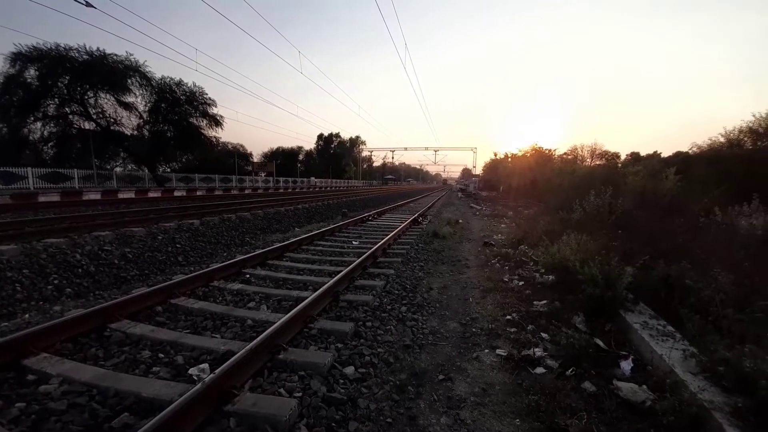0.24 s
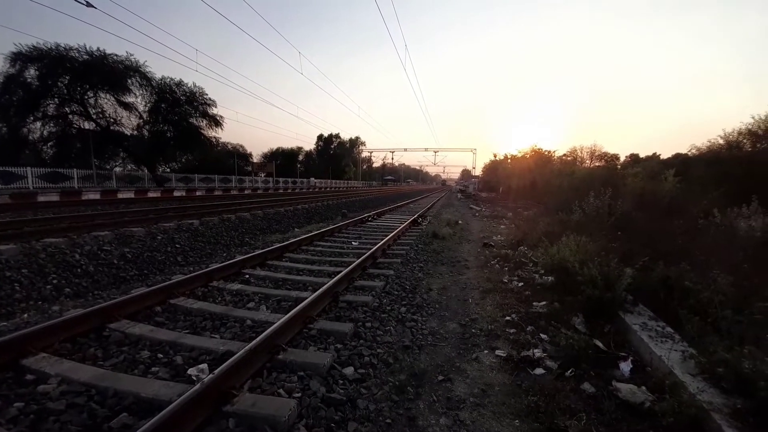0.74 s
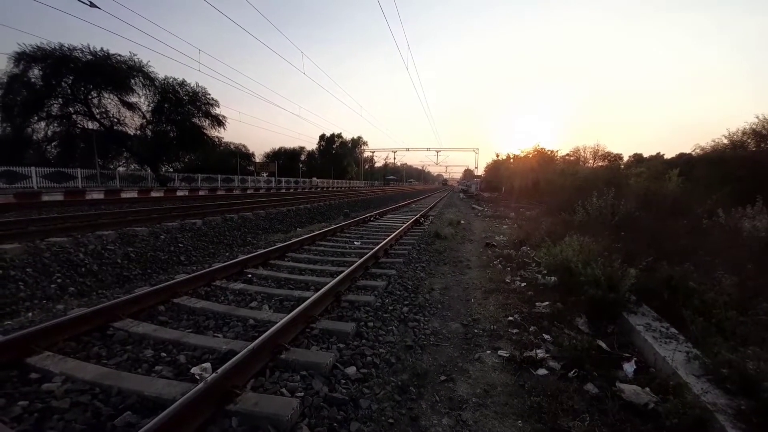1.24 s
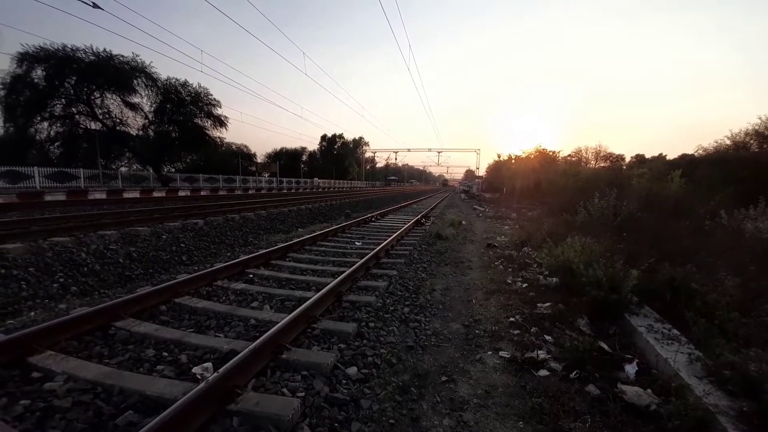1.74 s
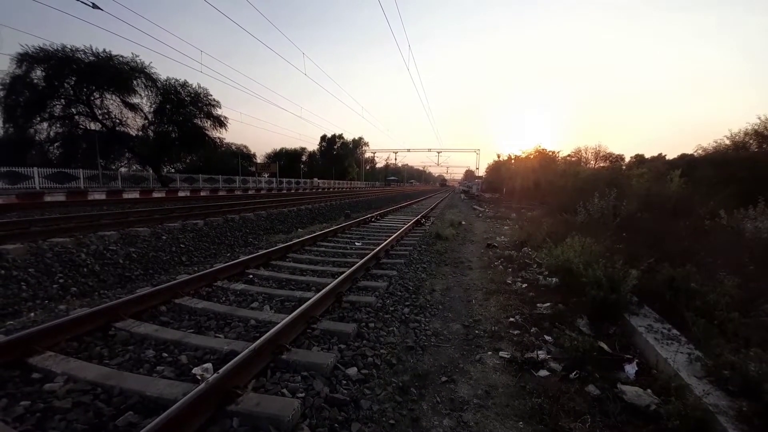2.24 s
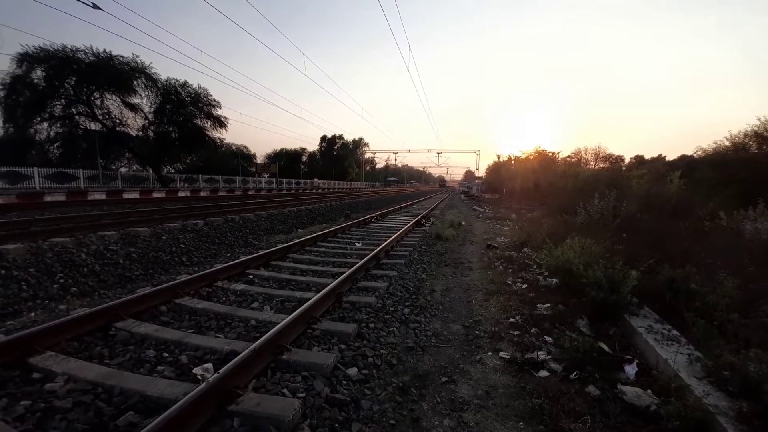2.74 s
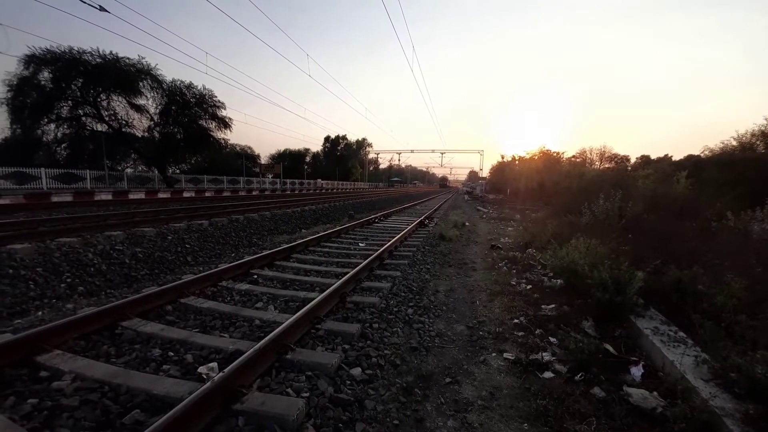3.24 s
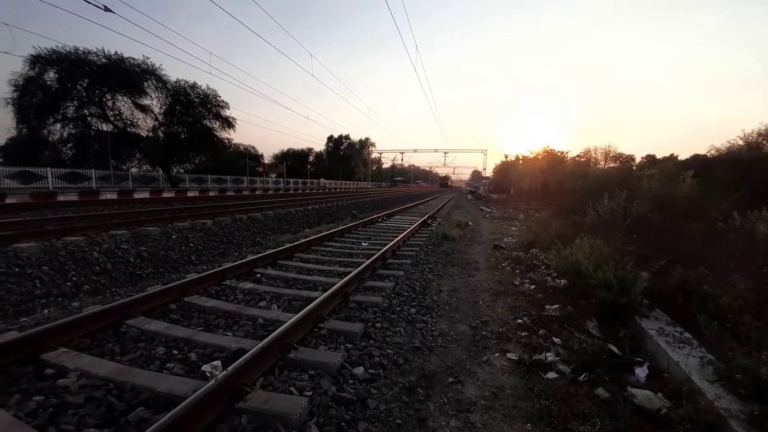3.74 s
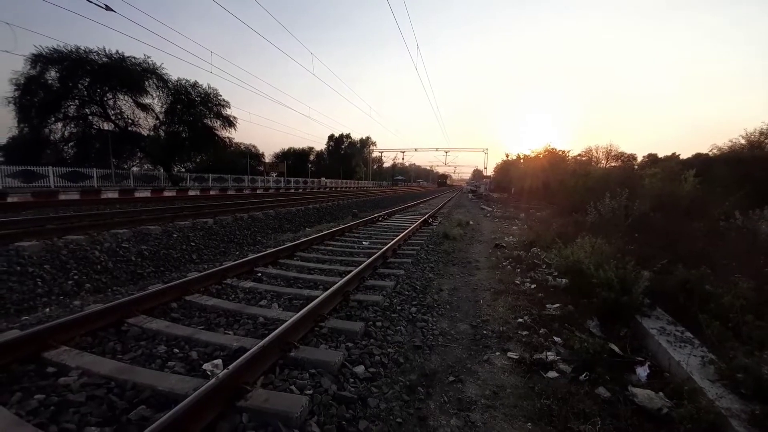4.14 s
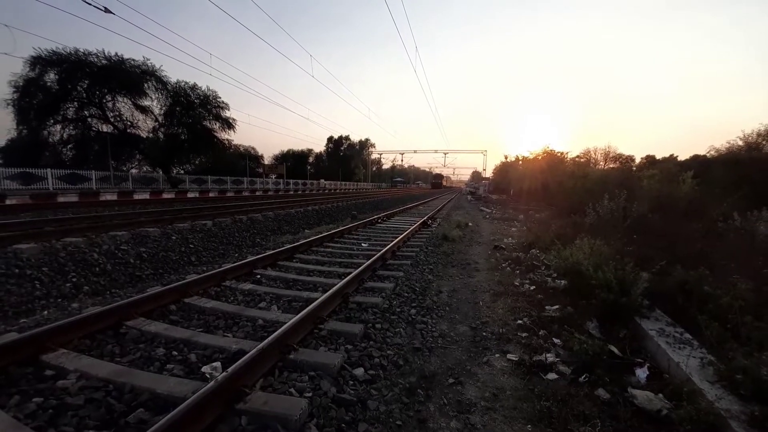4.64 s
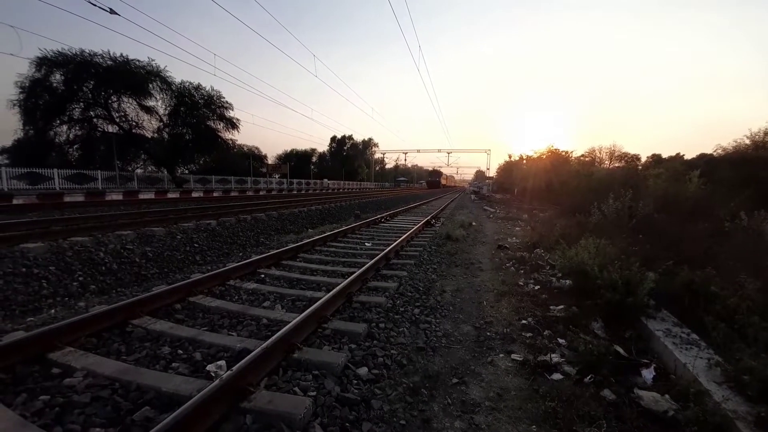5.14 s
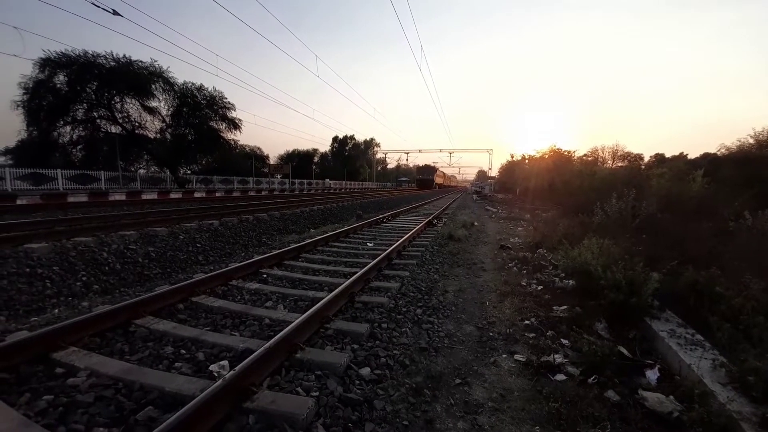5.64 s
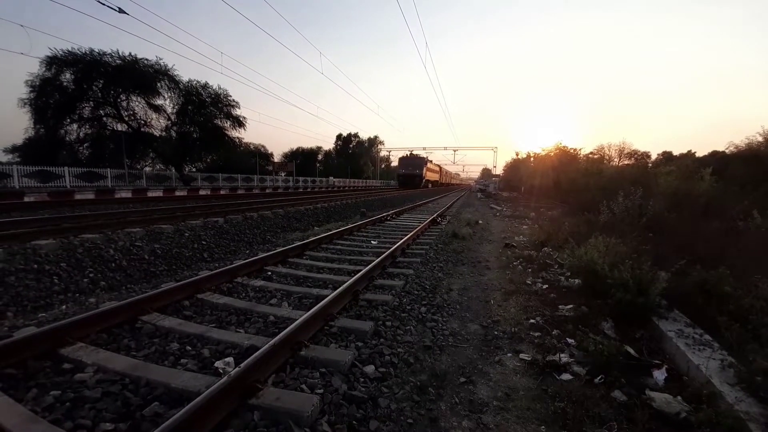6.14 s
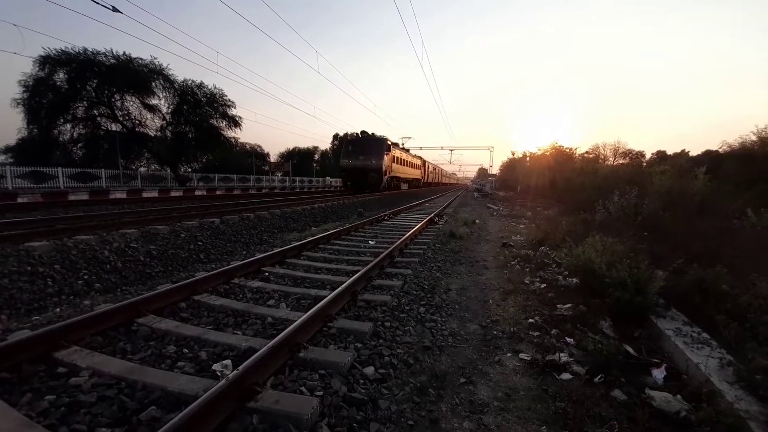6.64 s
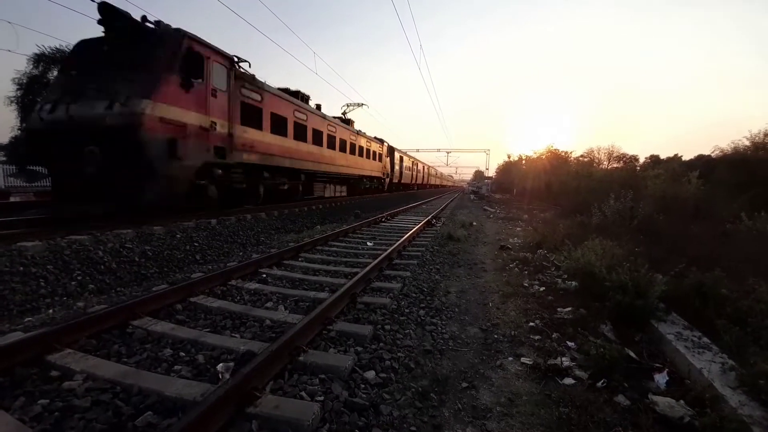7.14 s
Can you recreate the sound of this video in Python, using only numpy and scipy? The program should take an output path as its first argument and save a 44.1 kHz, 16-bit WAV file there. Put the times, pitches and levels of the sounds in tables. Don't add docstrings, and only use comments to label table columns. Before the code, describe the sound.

Open lineside at evening, stationary stereo microphone, the right channel muffled in the treble. From 0 s a distant train's air horn is already blowing: one reedy note around 380 Hz, held to about 5.2 s, beating, wavering in pitch and brightness, gradually stronger, with blurred echoes at lower pitches. Beneath it are still air, high insect hiss and a small bird's thin gliding whistles until about 4 s. Rails sing faintly near 1.1 kHz; clusters of tiny falling zings come around 0.2, 0.9, 1.7 and 2.4 s, with a stray one at 3.9 s. Around 5.1 s the horn's pitch rises and it dies, leaving echo. Low rumble, body drone and wheel roar grow steadily, surging roughly at 6.4 s. One short toot sounds at 6.7 s. From 7 s narrow metallic wheel rings cut through as the roar turns bright and very loud, ending abruptly with the train abreast.

```python
import sys
import numpy as np
from scipy import signal
from scipy.fft import rfft, irfft, next_fast_len
from scipy.io import wavfile
from scipy.ndimage import uniform_filter1d

SR = 44100
rng = np.random.default_rng(int(sys.argv[2]) if len(sys.argv) > 2 else 0)


def voltage_ratio(decibels):
    exponent = np.asarray(decibels, float) / 20
    return 10 ** exponent


def store_wav(level_fs):
    pcm = np.round(np.clip(np.atleast_2d(level_fs), -1, 1) * 32767)
    wavfile.write(sys.argv[1], SR, pcm.T.astype(np.int16))


N = 325017
HZ = np.fft.fftfreq(next_fast_len(N), 1 / SR)

# [multiple, level/dB, left-lead/rad]
UPPER_PARTIALS = [(4, -4.5, -0.68), (5, 6, 0.68), (6, 1, -0.15), (7, 3.5, -0.85), (8, -1, -0.14),
                  (9, -7, 0.68), (10, -2, -0.14), (11, -2.5, 0.41), (12, -3, .3), (13, -10, .3),
                  (14, -3, .3), (15, -13, .3)]
# [t/s, f/Hz]
REED_PITCH = [(0, 378), (.2, 377.1), (.5, 377.1), (1.05, 379.4), (1.35, 385.8), (1.5, 386.8), (1.68, 386.8),
              (1.9, 381.7), (2.15, 379.5), (2.4, 381.5), (2.8, 382.4), (3.3, 379), (3.75, 381.3),
              (3.87, 380.7), (4.08, 377.2), (4.85, 376.8), (5.16, 388), (5.3, 391)]
# [t/s, level/dB, clearness/dB]
HELD_BLAST = [(0, -25.5, 0.5), (.3, -23, 0.5), (.6, -22.5, -1.2), (.9, -23, -2.5), (1.1, -19.5, -3),
              (1.3, -26, -2), (1.7, -26, 3.5), (2.05, -19.5, 1), (2.5, -21.5, -1), (3.05, -19.5, -1),
              (3.5, -19, -2.5), (3.85, -18, -1), (4.05, -17.5, 3), (4.5, -17, -0.5), (4.9, -16.5, 0),
              (5.1, -20, -6), (5.22, -29.5, -5), (5.3, -44, -3)]
SPEED_M_PER_S, ASIDE_M, PASS_S = 28.8, 14.7, 7.447


def in_time(rows, late_s=0):
    s, *columns = np.transpose(rows)
    return [np.interp(np.arange(N) / SR - late_s, s, c) for c in columns]


def at_hz(points, hz):
    point_hz, point_db = np.transpose(points)
    return np.interp(np.log(hz + 1e-9), np.log(point_hz), point_db)


def gate(start, stop, edge):
    t = np.arange(N) / SR
    return np.clip(np.minimum(t - start, stop - t) / edge, 0, 1)


def wave_pair(gain, alike, lead):
    common, own = rng.standard_normal((2, len(gain))) + 1j * rng.standard_normal((2, len(gain)))
    alike = np.clip(alike, 0, 1)
    right = (alike * common + np.sqrt(1 - alike ** 2) * own) * np.exp(-1j * lead)
    pair = np.fft.ifft(gain * np.array([common, right]))[:, :N]
    return pair / np.sqrt(np.mean(abs(pair[0]) ** 2) / 2)


def noise(spectrum, alike_hz, lead_ms):
    inside = (HZ > spectrum[0][0]) & (HZ < spectrum[-1][0])
    gain = inside * voltage_ratio(at_hz(spectrum, abs(HZ)))
    alike = 1 / (1 + (HZ / alike_hz) ** 2)
    return wave_pair(gain, alike, 2 * np.pi * HZ * lead_ms / 1000).real


def resonance(hz, width, alike, lead):
    return wave_pair(1 / (1 + ((HZ - hz) / width * 2) ** 2), alike, lead).real


def tone(phase, lead):
    return np.sqrt(2) * np.sin(phase - np.array([[0], [lead]]))


def distance():
    return np.hypot(ASIDE_M, SPEED_M_PER_S * (PASS_S - np.arange(N) / SR))


def nearing(db, steepness, far_db):
    return np.hypot(voltage_ratio(db) * (ASIDE_M / distance()) ** steepness, voltage_ratio(far_db))


def horn():
    phase, heights = horn_partials(0)
    leads = [.3, .25, .3] + [lead for k, db, lead in UPPER_PARTIALS]
    out = 0
    for k, (height, lead) in enumerate(zip(heights, leads)):
        air = np.fft.ifft(rng.standard_normal(len(HZ)) / (1 + (HZ / 11.0) ** 2))[:N]
        shimmer = 1 + min(0.081 * k, .3) * air / np.std(air)
        partial_phase = (k + 1) * phase + np.angle(shimmer) + rng.uniform(0, 2 * np.pi)
        out = out + height * abs(shimmer) * tone(partial_phase, lead)
    return out


def horn_partials(late_s):
    # [level over blast/dB, loss/dB per Hz of sag, share of clearness, dB per dB of nearness]
    overtones = [
        (-2.5, 0.77, 0.14, -0.06),
        (-7, 0.55, 0.22, -0.27),
        (-23, 1.95, 1.1, -0.26),
        (-28, 1.67, .9, 0.8),
        (-36.5, 2.4, .9, -0.12),
    ]
    hz, sag, blast_db, clear_db = pressure(late_s)
    nearness_db = 20 * np.log10(100 / distance())
    second, third, *groups = [blast_db + db - loss * sag + share * clear_db + steepness * nearness_db
                              for db, loss, share, steepness in overtones]
    held = gate(-1, HELD_BLAST[-1][0] + late_s, 0.053)

    toot_s, toot_hold_s = 6.698, 0.12
    since = np.arange(N) / SR - late_s - toot_s
    sag_db = 34 * abs(since)
    release_db = 151 * np.maximum(since - toot_hold_s, 0)
    toot = gate(toot_s + late_s, N / SR + 1, 0.03) * voltage_ratio(-5 - sag_db - release_db)
    toot_second = toot * voltage_ratio(-7.5 - 120 * np.clip(since, 0, toot_hold_s))

    phase = np.cumsum(np.where(since > -.5, 385, hz)) * 2 * np.pi / SR
    heights = [held * voltage_ratio(blast_db) * beating(late_s) + toot,
               held * voltage_ratio(second) + toot_second,
               held * voltage_ratio(third)]
    for k, db, lead in UPPER_PARTIALS:
        group_db = groups[int(k > 6) + int(k > 9)]
        heights.append(held * voltage_ratio(group_db + db))
    return phase, heights


def pressure(late_s):
    hz, = in_time(REED_PITCH, late_s)
    full_pressure_hz = 377
    return (hz, hz - full_pressure_hz, *in_time(HELD_BLAST, late_s))


def beating(late_s):
    # [t/s, depth/dB]
    fades = [(.059, 9.5), (.42, 17.5), (.69, 6.5), (.92, 15.5), (1.17, 9), (1.31, 8), (1.45, 3.5),
             (1.7, 12.5), (2.181, 14), (2.371, 14), (2.49, 7), (2.65, 6.5), (2.81, 4.5), (3.0, 8.5),
             (3.21, 4.5), (3.361, 10), (3.45, 5), (3.59, 3.5), (3.72, 7.5), (3.83, 5), (4.039, 4.5),
             (4.22, 5), (4.47, 1), (4.58, 0.5), (5.01, 3), (5.3, 8)]
    moments = [(-.3, 9.3)] + fades
    numbered = [(s, k, db) for k, (s, db) in enumerate(moments)]
    turn, depth_db = in_time(numbered, late_s)
    least = voltage_ratio(-abs(depth_db))
    return least + (1 - least) * abs(np.sin(np.pi * turn)) ** 1.13


def horn_echoes():
    # [pitch ratio, level/dB]
    near_shape = [(.955, -30), (.968, -6), (.976, 0), (.985, -5), (1.0, -5), (1.006, -40)]
    # [pitch ratio, level/dB]
    far_shape = [(.835, -40), (.841, 0), (.847, 0), (.856, -11), (.92, -12), (.96, -10), (.97, -30)]
    near = horn_echo(near_shape, column=1, late_s=0.1795, spread_s=0.11, alike=0.96, right_db=2.5, wall_db=-56.5)
    far = horn_echo(far_shape, column=2, late_s=.3, spread_s=0.24, alike=0.89, right_db=2.5, wall_db=-4.5)
    return near + far


def horn_echo(shape, column, late_s, spread_s, alike, right_db, wall_db):
    # [multiple, near level/dB, far level/dB]
    echo_levels = [(1, -13.5, -16), (2, -18.5, -29), (3, -27, -12.5), (4, -10, -5.5), (5, -11, -11.5),
                   (6, -9.5, -23), (7, -17.5, -7), (8, -5.5, -14), (9, -2.5, -7), (10, -12, 3.5)]
    # [t/s, level/dB]
    echo_share = [(0, 8), (1.4, -1), (2.5, 1.5), (4.5, 0.5), (5.5, -5.5), (6.6, -14.5), (7.37, -9.5)]
    back_wall = .8435
    phase, heights = horn_partials(late_s)
    ratios, shape_db = np.transpose(shape)
    smear = np.exp(-1 / (spread_s * SR))
    out = 0
    for row, height in zip(echo_levels, heights):
        k = row[0]
        start = [np.mean(height[:SR] ** 2)]
        power = signal.lfilter([1 - smear], [1, -smear], height ** 2, zi=start)[0]
        ratio = 1 + HZ / (k * REED_PITCH[0][1])
        gain = voltage_ratio(np.interp(ratio, ratios, shape_db, left=-200, right=-200))
        scatter = (wave_pair(gain, alike ** k, 0.21) * np.exp(1j * k * phase)).real
        wall = voltage_ratio(wall_db) * tone(k * back_wall * phase, 0.1)
        out = out + voltage_ratio(row[column]) * np.sqrt(power) * (scatter + wall)
    return out * voltage_ratio(in_time(echo_share)[0] + np.array([[0], [right_db]]))


def train():
    # [f/Hz, level/dB per Hz]
    rumble_colour = [(13, -42.5), (22, -14), (34, -17.5), (48, 9), (92, 12.5), (135, -13), (180, -39.5),
                     (300, -120)]
    # [f/Hz, level/dB per Hz]
    body_colour = [(59, -40), (100, 5.5), (199, -9), (226, -6), (257, -4.5), (289, 1), (329, 2.5),
                   (623, -10.5), (708, -3), (906, -4.5), (1050, -13.5), (1360, -32), (2310, -120)]
    # [f/Hz, level/dB per Hz]
    roar_colour = [(740, -12.5), (1250, -0.5), (1410, -20.5), (1580, -7.5), (1850, -16.5), (1930, -7.5),
                   (2570, -16.5), (2890, -11.5), (5920, -23.5), (11000, -45), (14300, -73), (22000, -120)]
    # [f/Hz, level/dB per Hz]
    hiss_colour = [(2350, -40), (4000, 1.5), (4530, -0.5), (5020, -12), (5560, 1.5), (6060, -10.5),
                   (6790, 4), (7870, -8.5), (12500, -3), (14700, -10), (15600, -20)]
    # [f/Hz, level/dB per Hz]
    abreast_colour = [(900, -29.5), (1400, -7.5), (2000, -2.5), (3000, -1), (4200, -5), (6000, -14.5),
                      (10000, -25.5), (16000, -45)]
    t = np.arange(N) / SR
    rumble = nearing(-26.5, 0.92, -60)
    out = rumble * noise(rumble_colour, alike_hz=900, lead_ms=0.35)
    out += rumble * voltage_ratio(-7.5) * resonance(84.2, 6.0, 0.86, 0.33)

    sleeper_swell_db = 2.5 * np.cos(2 * np.pi * (t - 5.45) / 1.05)
    out += nearing(-41.5, 0.92, -81) * voltage_ratio(sleeper_swell_db) * tone(2 * np.pi * 54 * t, .05)
    out += nearing(-17.5, 1.7, -53.5) * noise(body_colour, alike_hz=1800, lead_ms=0.25)

    rough_rail = voltage_ratio(3 * np.exp(-((t - 6.41) / 0.29) ** 2))
    hz, sag, blast_db, clear_db = pressure(0.067)
    breath = voltage_ratio(blast_db - 24.5 - 2.5 * sag)
    roar = np.hypot(nearing(-21.5, 1.39, -57.5) * rough_rail, breath)
    out += roar * noise(roar_colour, alike_hz=3500, lead_ms=0.078)

    hiss = nearing(-34.5, 0.83, -90) * voltage_ratio(-.05 * distance())
    out += hiss * noise(hiss_colour, alike_hz=5000, lead_ms=0.09)
    out += nearing(-17, 0.81, -59) * rail_song()
    return out + nearing(-18, 9, -90) * noise(abreast_colour, alike_hz=2500, lead_ms=.3)


def rail_song():
    # [t/s, f/Hz, level/dB]
    song_line = [(0, 1120.5, -3), (1.2, 1121, 1.5), (4, 1121.5, 2.5), (6, 1123.5, 1), (7.0, 1126, 0),
                 (7.37, 1130, -3)]
    # [f/Hz, width/Hz, level/dB, left-lead/rad, likeness 0-1]
    neighbours = [
        (1084, 6.2, -10.5, 3.4, .85),
        (1175, 23, -2, 2.34, 1),
        (1160, 8.3, -10.5, 2.6, 1),
        (1006, 23, -21.5, 2.9, 1),
        (1140, 318, -2, 2.22, 0.74),
    ]
    hz, db = in_time(song_line)
    flutter = 1 + 0.43 * wave_pair(1 / (1 + (HZ / 9) ** 2), 0.34, 0)
    phase = np.cumsum(hz) * 2 * np.pi / SR - np.array([[0], [3.1]])
    out = np.sqrt(2) * voltage_ratio(db) * (flutter * np.exp(1j * phase)).real
    for hz, width, db, lead, alike in neighbours:
        out = out + voltage_ratio(db) * resonance(hz, width, alike, lead)
    return out


def wheels():
    # [t/s, level/dB, f/Hz, length/s]
    rings = [
        (6.654, -30, 1153, 0.02),
        (6.958, -24, 1175, 0.021),
        (7.138, -15.5, 1175, 0.022),
        (7.216, -11, 1161, 0.03),
        (7.254, -19.5, 1105, .015),
        (7.308, -12.5, 1146, 0.013),
        (7.351, -12, 1131, .02),
    ]
    t = np.arange(N) / SR
    out = 0
    for s, db, hz, length in rings:
        swell = np.exp(-((t - s) / length) ** 2)
        out = out + voltage_ratio(db) * swell * tone(2 * np.pi * hz * t, 0.97)
    return out


def zings():
    # [t/s, level/dB]
    coaches = [
        (0.2122, -46),
        (.9494, -49),
        (1.691, -48),
        (2.424, -48),
    ]
    # [t after the first/s, level/dB]
    axles = [
        (0, 0.5),
        (.098, 0.5),
        (.251, -1),
        (.346, 0),
    ]
    # [t/s, level/dB]
    stray_blows = [
        (.4407, -47),
        (3.91, -49.5),
    ]
    t = np.arange(int(.15 * SR)) / SR
    out = np.zeros((2, N + len(t)))
    treble = signal.butter(3, [12000, 14400], "band", fs=SR, output="sos")
    trail = signal.sosfilt(treble, rng.standard_normal(out.shape))
    fall_hz = 9800 + 5200 * np.exp(-t / 0.0055)
    chirp = np.sin(np.cumsum(fall_hz) * 2 * np.pi / SR) * (t / 0.0036) * np.exp(1 - t / 0.0033)
    swell = (t / 0.022) * np.exp(1 - t / 0.018)
    blows = [(s + lag, db + d) for s, db in coaches for lag, d in axles] + stray_blows
    for s, db in blows:
        i = int((s - .002) * SR)
        zing = voltage_ratio(-3.5) * chirp + voltage_ratio(3.5) * swell * trail[:, i:i + len(t)]
        out[:, i:i + len(t)] += voltage_ratio(db) * zing
    return out[:, :N]


def bird():
    # [t after the start/s, f/Hz, level/dB]
    chip = [(0, 4430, -6), (.028, 4700, 0.1), (.06, 5000, -18)]
    rise = [(0, 4090, -11), (.036, 4476, 0), (.072, 4940, -12), (.244, 5225, -18.5), (.296, 5649, -9),
            (.32, 5730, -34)]
    arch = [(0, 4050, -18), (.02, 3850, -10), (.085, 4140, 0), (.15, 3780, -13), (.185, 3850, -21)]
    fall = [(0, 4840, -18), (.042, 4630, 1.5), (.11, 3570, -13), (.138, 3480, -7), (.21, 3158, -11)]
    peep = [(0, 4160, -6), (.02, 4240, 0), (.045, 4120, -8)]
    # [t/s, level/dB, pitch ratio, note number]
    bird_song = [(.132, -49, 1.01, 0), (.625, -54, .97, 0), (.88, -45, 1, 1), (1.27, -57, 1, 4),
                 (1.37, -49.5, 1, 2), (1.56, -60, 1.02, 4), (1.73, -49, 1, 3), (1.97, -57, .94, 0),
                 (2.408, -57, .875, 0), (2.585, -58, .84, 0), (2.715, -60, 1.06, 4), (3.13, -51, 1, 1),
                 (3.59, -48, 1, 2), (3.96, -54, .98, 3)]
    out = 0
    for start, call_db, ratio, number in bird_song:
        note = [chip, rise, arch, fall, peep][number]
        hz, db = in_time(note, start)
        whistle = tone(np.cumsum(ratio * hz) * 2 * np.pi / SR, 0.25)
        out = out + gate(start, start + note[-1][0], 0.0089) * voltage_ratio(call_db + db) * whistle
    out = out + voltage_ratio(-11.5) * np.roll(out, int(.02 * SR), axis=1)
    return out * voltage_ratio(np.array([[1.5], [4.5]]))


def evening_air():
    # [f/Hz, level/dB per Hz]
    air_colour = [(59, -50.5), (100, -21), (172, -36), (264, -19), (387, -14.5), (476, -18), (698, -22),
                  (768, -14), (845, -11.5), (1140, -19), (1480, -27), (1900, -19.5), (4500, -37),
                  (5850, -78.5), (9900, -120)]
    # [f/Hz, level/dB per Hz]
    bush_colour = [(2350, -29), (4000, -15), (5250, -10), (5850, -23), (6270, -21), (6560, -3.5),
                   (6980, -4), (7470, -25), (7690, -32.5), (8190, -26), (8710, -31.5), (9280, 1.5),
                   (10100, -12.5), (13400, 3), (15600, -3.5)]
    air = voltage_ratio(-41) * noise(air_colour, alike_hz=2500, lead_ms=0.038)
    return air + voltage_ratio(-58) * noise(bush_colour, alike_hz=4000, lead_ms=0.16)


def scene():
    return horn() + horn_echoes() + train() + wheels() + zings() + bird() + evening_air()


def band_limit(x):
    return signal.sosfilt(signal.butter(12, 15780, fs=SR, output="sos"), x)


def record(dry):
    # [f/Hz, level/dB]
    right_port = [(50, 2.5), (250, 1.4), (800, -0.5), (1300, -2.0), (2600, -2), (3600, -1.5), (4300, -9.5),
                  (5200, -40), (6200, -34.5), (7500, -41), (9300, -32.5), (11000, -16.5), (12400, -4),
                  (15000, -7.5)]
    size = next_fast_len(N)
    colour = voltage_ratio(at_hz(right_port, np.fft.rfftfreq(size, 1 / SR)))
    right = irfft(rfft(dry[1], size) * colour, size)[:N]
    x = np.array([dry[0], right]) + voltage_ratio(-83) * rng.standard_normal((2, N))

    limit_db, limit_share, attack_s, recovery_db_per_s = -15, 0.31, 0.025, 21
    smooth = np.exp(-1 / (attack_s * SR))
    power = signal.lfilter([1 - smooth], [1, -smooth], np.mean(x ** 2, axis=0))
    level_db = 10 * np.log10(power + 1e-12)
    climb_db = recovery_db_per_s * np.arange(N) / SR
    held_db = np.maximum.accumulate(level_db + climb_db) - climb_db
    held_db = uniform_filter1d(held_db, size=400)
    x = x * voltage_ratio(-limit_share * np.maximum(held_db - limit_db, 0))
    return band_limit(1.198 * np.tanh(x / 1.217))


dry = scene()
out = record(dry)
store_wav(out)
```